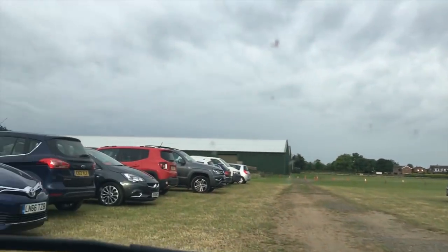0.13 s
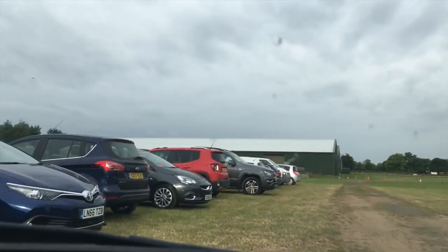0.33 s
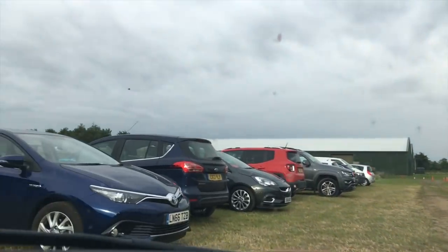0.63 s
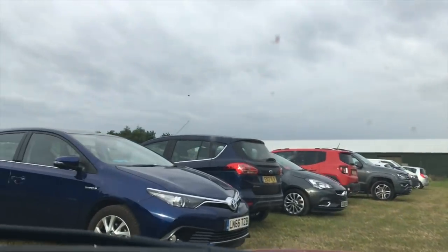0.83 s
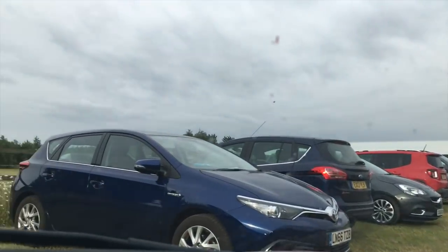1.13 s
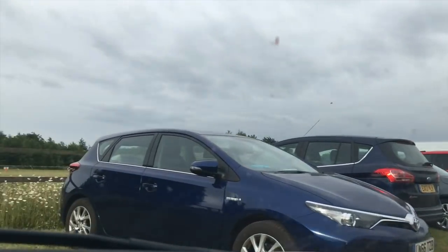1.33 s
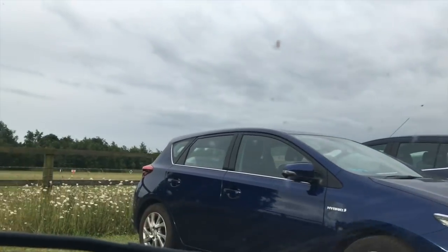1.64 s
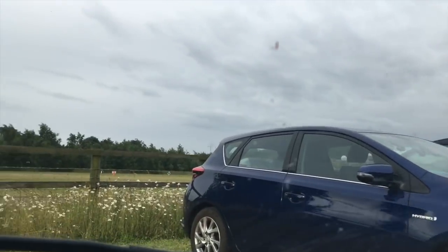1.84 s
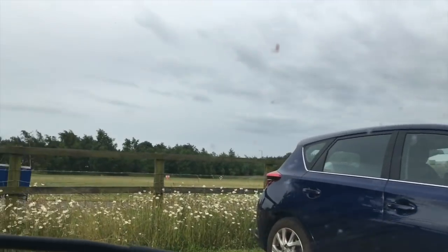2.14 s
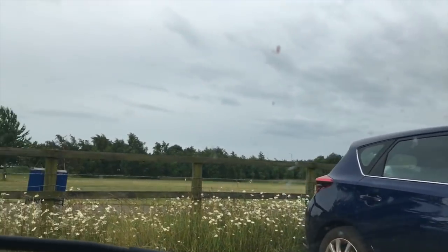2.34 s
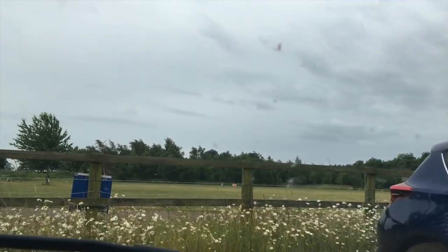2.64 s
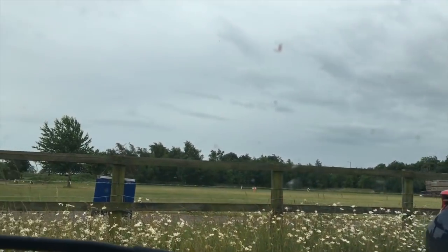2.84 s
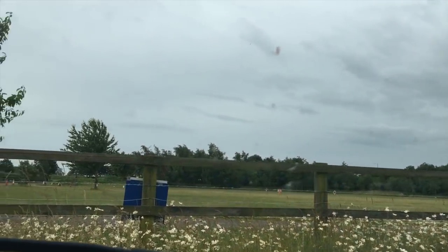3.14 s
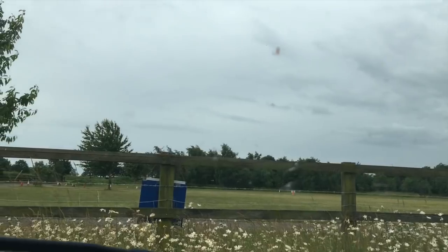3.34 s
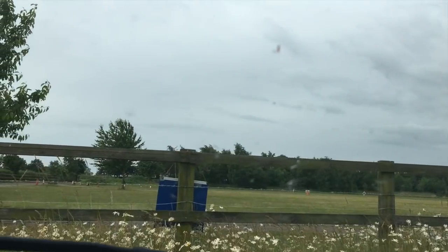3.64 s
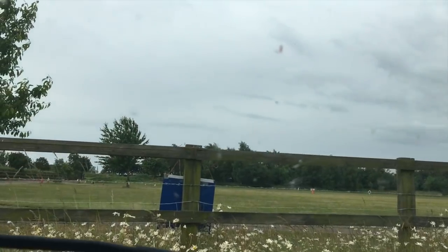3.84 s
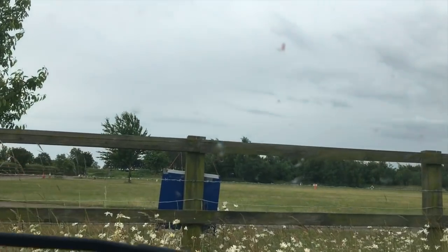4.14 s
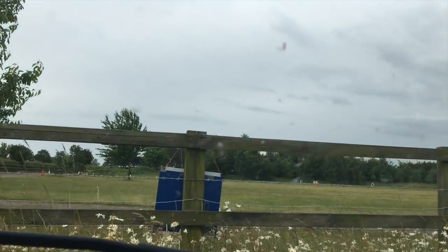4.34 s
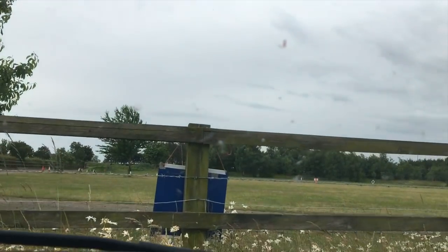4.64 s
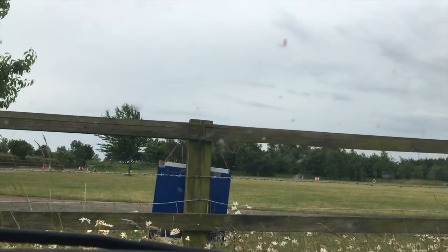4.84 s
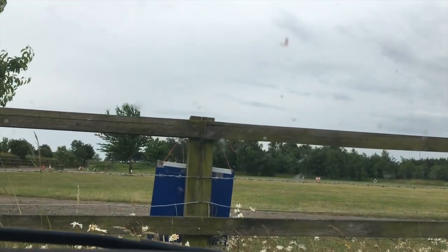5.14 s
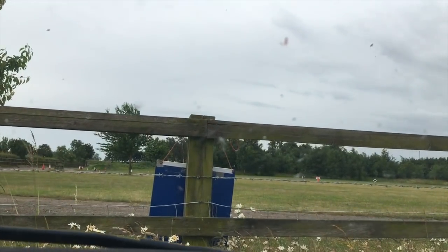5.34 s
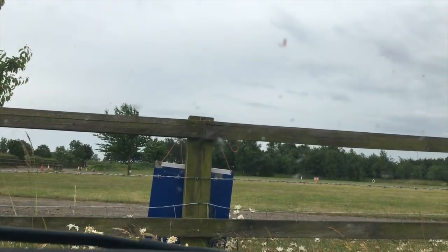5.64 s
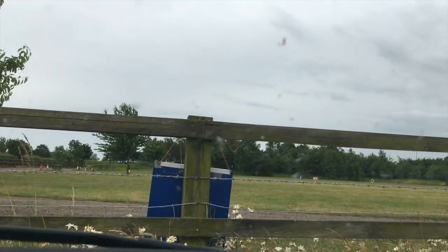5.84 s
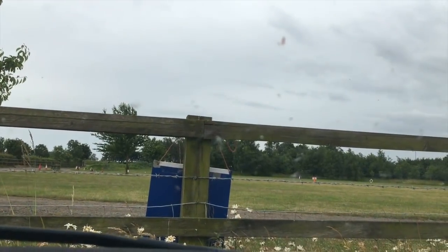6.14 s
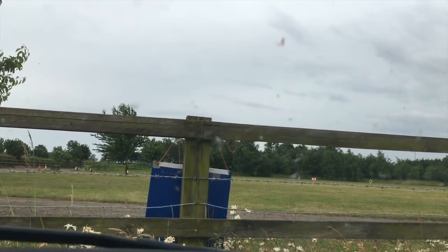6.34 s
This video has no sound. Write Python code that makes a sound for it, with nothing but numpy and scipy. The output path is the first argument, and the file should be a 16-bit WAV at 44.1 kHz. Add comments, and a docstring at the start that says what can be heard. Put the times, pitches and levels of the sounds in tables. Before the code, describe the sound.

Heard from a front seat in mono, a car creeps over uneven grass with a deep engine boom, low tyre rumble and steady fan rush. Plastic trim clicks sparsely and keys tinkle finely, strongest around the middle. The ground shaking eases as the car slows, then the handbrake ratchets over four quick teeth, surrounded by dull thumps.

```python
"""Creeping car and handbrake

Inside a slow car the engine booms, a fan rushes and uneven ground shakes the body and tyres.
Keys tinkle as rings of many sine waves, and plastic parts click as short bursts of shaped noise.
Soft swishes come and go. Late on, the handbrake clicks over four teeth and rings the floor pan,
with dull thumps, made of low noise, around it.
"""
import sys
import numpy as np
from scipy import signal
from scipy.fft import rfft, irfft, next_fast_len
from scipy.io import wavfile

SR = 44100
rng = np.random.default_rng(int(sys.argv[2]) if len(sys.argv) > 2 else 0)


def store_pcm(level_fs):
    """Save levels as 16-bit WAV."""
    pcm = np.round(np.clip(level_fs, -1, 1) * 32767).astype(np.int16)
    wavfile.write(sys.argv[1], SR, np.atleast_2d(pcm).T)


N = 286764
TIME = np.arange(N) / SR   # seconds

# The "colour" tables give a noise spectrum; only its shape matters: (frequency [Hz], level [dB])

# Fan rush through the air ducts: (frequency [Hz], level [dB])
FAN_COLOUR = [(120, -24), (170, 8), (225, 9), (270, 0.5), (340, 0), (420, -7), (600, -5.5), (850, -10.5),
              (1250, -27), (2000, -18), (3000, -30.5), (5000, -32.5), (8000, -37.5), (11000, -40.5),
              (16000, -40)]
# Duct resonances: (frequency [Hz], width [Hz], level [dB])
DUCTS = [(1004.6, 84, -57), (1468, 85, -60.5), (2130, 400, -72), (2740, 89, -78.5), (3228, 66, -78),
         (3786, 190, -74.5), (5160, 440, -81), (5970, 230, -83.5), (6780, 210, -89.5)]

# Engine near idle, boom at twice the firing rate: (time [s], boom frequency [Hz], relative level [dB])
ENGINE = [(0, 55.9, -31.5), (1.9, 55.28, -33), (2.4, 56.92, -30), (3.3, 55.64, -33.5), (3.6, 53.96, -33.5),
          (3.95, 52.33, -33), (4.3, 57.3, -37), (4.58, 58.96, -29), (4.8, 55.6, -33), (5.15, 56.2, -35),
          (5.3, 52, -30.5), (5.5, 48.3, -37), (5.9, 46.96, -37.5), (6.5, 45.4, -44.5)]
# Tones that make up the engine: (multiple of the boom frequency [-], relative level [dB])
ENGINE_ORDERS = [(.5, -31), (1, 2), (1.5, -13), (2, -14), (3, -33.5), (4, -18)]
BOOM_FLUTTER_DB = 0.5   # wobble of the boom where GROUND is 0 dB

# How hard the ground shakes the car: (time [s], level [dB])
GROUND = [(0, -3.5), (0.55, 3.5), (1.1, -6), (1.8, -6), (2.2, -21.5), (3.8, -17.5), (4.35, -9), (4.9, -18),
          (6.5, -7)]
# The wheels roll over a hump: (time of the middle [s], swell [dB])
HUMPS = [(0.027, 2), (0.36, 2.5), (0.59, 4), (0.8, 4), (1.22, 3), (1.77, 7), (3.5, 3.5), (3.72, 3)]
HUMP_S, HUMP_HEAVE_SHARE = 0.2, 0.85   # length of a hump; share of its swell that heaves the body
# Slow shaking of the body: (frequency [Hz], level [dB])
HEAVE_COLOUR = [(24, -7), (31, 1.5), (38, 1.5), (55, -28), (70, 0), (100, -15)]
# Jolts of the suspension: (frequency [Hz], level [dB])
JOLT_COLOUR = [(60, 4.5), (78, -9.5), (98, 3), (112, -6.5), (130, -12)]
# Tread drumming through the floor: (frequency [Hz], level [dB])
RUMBLE_COLOUR = [(60, -16), (90, 3.5), (110, -4.5), (135, 1.5), (170, -3.5), (230, -5.5), (300, -16),
                 (420, -27), (800, -33), (1600, -53)]
# Average level where GROUND is 0 dB, away from humps, and share of the ground's swing followed
HEAVE_DB, HEAVE_FOLLOWS = -34.5, 1.0
JOLT_DB, JOLT_FOLLOWS = -30.5, 0.82
RUMBLE_DB, RUMBLE_FOLLOWS = -38.5, 0.29

# Soft high swishes, like hands sliding on the wheel: (time of the middle [s], length [s], level [dB])
SWISHES = [(0.408, 0.35, -67.5), (1.855, 0.25, -79), (2.56, .45, -73), (3.453, 0.42, -74), (5.88, .2, -69),
           (6.163, 0.4, -74)]
# Rustle of the swishes: (frequency [Hz], level [dB])
RUSTLE_COLOUR = [(4000, -11), (7000, -7), (10000, -7), (13000, -2), (16000, -4)]
HISS_DB = -85.5   # faint rustle between the swishes

# Plastic clicks: (time [s], relative level [dB], tilt [dB per octave],
# ring frequency [Hz], ring against the click [dB])
CLICKS = [(0.2525, -38, 1, 4220, -9.5), (0.3212, -42, 3.5, 3900, -27), (0.953, -37.5, 4, 4330, -6),
          (1.0017, -40, -2.5, 1190, -3), (1.6926, -38.5, 2, 4330, -8), (1.7411, -36, 1.5, 1210, -7),
          (2.4092, -33, 1, 4420, -9.5), (2.448, -35, -5, 800, -9), (2.541, -51.5, 7, 4470, -4),
          (5.4924, -50, 5.5, 2490, -1.5), (5.9706, -40, 5.5, 2060, 0), (5.9907, -39.5, 4, 1020, 3.5),
          (6.0753, -45.5, 7, 2640, -7)]
# Plastic noise: (frequency [Hz], level [dB])
CLICK_COLOUR = [(300, 2.5), (500, -21), (720, 6.5), (1000, 5), (1220, 4.5), (1600, -2), (2150, 1.5),
                (2550, -4), (3100, -6.5), (4200, -8.5), (6000, -9.5), (7500, -14), (16000, -20)]

# Dull thumps in the footwell: (time [s], relative level [dB], tilt [dB per octave])
THUMPS = [(5.480, -32.5, 2.5), (5.662, -21.5, -5), (5.692, -20.5, -7.5), (5.742, -25.5, -1.5),
          (5.781, -28, -7), (5.978, -23.5, -3), (6.185, -21.5, -5.5), (6.291, -20.5, 1.5), (6.370, -17, -2)]
# Thump noise: (frequency [Hz], level [dB])
THUMP_COLOUR = [(50, -23), (80, -3), (120, 4), (160, -2.5), (205, -1.5), (250, -15), (300, -13), (355, -11),
                (440, -34.5), (520, -29.5)]
THUMP_RISE_S, THUMP_HOLD_S, THUMP_T60_S = 0.0094, 0.026, 0.15   # t60: time to fall by 60 dB

# Handbrake catch dropping over a tooth:
# (time [s], relative level [dB], tilt [dB per octave], relative blow to the floor pan [dB])
TEETH = [(5.641, -27.5, -0.5, -16), (5.670, -26, 1.5, -12.5), (5.7009, -27.5, 1.5, -25),
         (5.732, -29.5, 0.5, -32)]
# Catch noise: (frequency [Hz], level [dB])
PAWL_COLOUR = [(350, -1.5), (480, -9), (650, -7), (1060, 3), (1250, -15), (1480, 1.5), (1900, -9),
               (2350, 4), (3200, -3.5), (4300, -6), (6000, -10), (7600, -14.5), (12000, -11.5),
               (16000, -17)]
# Squeaks as the catch rides up a tooth: (time [s], level [dB])
SQUEAKS = [(5.634, -38), (5.657, -46), (5.726, -45)]
# Squeak noise: (frequency [Hz], level [dB])
SQUEAK_COLOUR = [(2400, -32), (2700, 3), (2850, -17), (3050, -8), (3400, -31)]
# Ringing of the floor pan: (frequency [Hz], relative level [dB], time to fall by 60 dB [s])
FLOOR_MODES = [(97.2, -16.5, 0.34), (125, -15.5, 0.18), (164, -30, 0.065), (260.5, 3.5, 0.14),
               (284.4, -8, 0.26), (430, -6, 0.085)]

# Keys knocking together: (time [s], relative level [dB], middle modes [dB], low modes [dB])
KEY_TOUCHES = [(1.044, -46.5, 2, 1), (1.1325, -49, -10, -8), (1.2276, -37, -5, -5), (1.3239, -43, -10, -13),
               (1.3597, -41.5, -17, -3), (1.5321, -43, -11, -2), (1.6396, -46, 2, -1.5),
               (1.8306, -48.5, -2, 0), (1.9783, -56, -8, -6), (2.2403, -50, 4, 2), (2.2879, -45, -8, 0),
               (2.361, -44, -11, -10), (2.4553, -37.5, -12, -4), (2.9258, -35, -16, -1),
               (2.9822, -40.5, -13, -16), (3.0807, -38.5, -9, -4), (3.2246, -45, -6, 4),
               (3.2968, -35, -2, 2.5), (3.5667, -27.5, -3, 0.5), (3.5856, -42, -4, -2),
               (3.68, -39.5, -8, -7), (3.8836, -26.5, 6, -2), (3.933, -49.5, 1.5, 9), (4.1775, -33, 2, 9),
               (4.2727, -36, -14, -12), (4.5131, -39.5, 3, 1), (4.6713, -51.5, 6, 4), (4.7775, -39, -6, -4),
               (5.3803, -49, -5, 3), (6.2223, -52, -9, -7)]
# Ringing of the keys: (average frequency [Hz], relative level [dB], time to fall by 60 dB [s])
KEY_MODES = [(4370, -8.5, .04), (5540, -9.5, .037), (6231, -13.5, .032), (8948, -12, .03),
             (9260, 1.5, .028), (9450, -4, .035), (10850, -7, .03), (11150, 4, .028), (11350, -4, .04),
             (11900, -8, .025), (12400, -4, .028), (12750, -6, .028), (13150, -8, .025), (13930, -10, .025),
             (14750, -11, .026), (15250, -2, .036), (15470, -5, .04)]
# Lighter touches by chance; below 0 means none: (time [s], rate [touches per s])
KEY_SWING = [(0.5, -0.5), (1.1, 18.5), (2.4, 24), (3.2, 7.5), (5.3, 3.5), (6.5, 1.5)]
LIGHT_TOUCH_DB, LIGHT_SPREAD_DB = -56, 3.5   # middle of the relative level, and reach either side
LIGHT_LOWER_MODES_DB = -4   # change of the low and middle modes in a light touch
KEY_CRACK, KEY_CRACK_S, KEY_RISE_S = 1.5, 0.0027, 0.003   # crack strength, fade and rise times
KEY_CRACK_SPREAD_DB, KEY_SCATTER_DB = 1.5, 2.5   # chance in the crack and in each mode

# Dips of the microphone port: (frequency [Hz], width [Hz])
PORT_DIPS = [(4850, 270), (7800, 350), (10300, 320)]
CUTOFF_HZ = 15900


def from_db(db):
    """Turn decibels into a gain."""
    return 10 ** (np.asarray(db) / 20)


def rms_one(x):
    """Scale to an average strength (rms) of 1."""
    return x / np.sqrt(np.mean(x ** 2) + 1e-20)


def in_time(rows):
    """Draw each column of a time table as a curve with a value at every sample."""
    s, *columns = np.transpose(rows)
    return [np.interp(TIME, s, column) for column in columns]


def drift(rate):
    """Smooth random wander of rms 1, made of noise below about rate hertz."""
    # one value per 40 samples; the first 2000 let the filter settle
    r = np.exp(-80 * np.pi * rate / SR)
    raw = rng.standard_normal(N // 40 + 2002)
    slow = signal.lfilter([1], [1, -2 * r, r * r], raw)[2000:]
    return np.interp(np.arange(N) / 40, np.arange(len(slow)), rms_one(slow))


def noise(colour, tilt_db=0, size=N):
    """Noise of rms 1 with a given spectrum, tilted per octave and falling steeply past its ends."""
    hz, db = np.transpose(colour)
    length = next_fast_len(size)
    octave = np.log2(np.maximum(np.fft.rfftfreq(length, 1 / SR), 1))
    outside = np.abs(octave - np.clip(octave, np.log2(hz[0]), np.log2(hz[-1])))
    shape_db = np.interp(octave, np.log2(hz), db) + tilt_db * octave - 24 * outside
    spectrum = rfft(rng.standard_normal(length)) * from_db(shape_db)
    return rms_one(irfft(spectrum, length)[:size])


def ring(drive, hz, t60):
    """One ringing tone (a mode): a unit click starts a fading sine of height about 1."""
    r = from_db(-60 / (t60 * SR))
    w = 2 * np.pi * hz / SR
    return signal.lfilter([0, np.sin(w)], [1, -2 * r * np.cos(w), r * r], drive + 1e-18)


def burst(colour, tilt_db, rise_s, t60, hold_s=0, size=SR // 3):
    """A blow on a part with many close modes: noise swells, may hold, then dies away."""
    t = TIME[:size]
    fade_db = -60 * np.maximum(t - rise_s - hold_s, 0) / t60
    envelope = np.minimum(t / rise_s, 1) * from_db(fade_db)
    return rms_one(noise(colour, tilt_db, size) * envelope) * np.sqrt(np.mean(envelope ** 2))


def band(hz):
    """The spectrum of one narrow resonance."""
    return [(hz / 1.3, -26), (hz / 1.03, -3), (hz, 0), (hz * 1.03, -3), (hz * 1.15, -26)]


def swell(s, length_s):
    """A smooth rise and fall of height 1 around a moment."""
    return np.cos(np.pi * np.clip((TIME - s) / length_s, -.5, .5)) ** 2


def add(out, s, sound):
    """Mix a sound in at a time."""
    start = round(s * SR)
    out[start:start + len(sound)] += sound[:N - start]


def cabin(x, wet_db, t60, size=SR // 10):
    """Glass and dashboard return dense reflections that the seats soon soak up."""
    t = TIME[:size]
    echoes = rng.standard_normal(size) * from_db(-60 * t / t60) * (t > .001)
    wet = signal.fftconvolve(x, echoes / np.linalg.norm(echoes))[:len(x)]
    return x + from_db(wet_db) * wet


def air():
    """The fan's rush is noise with a slight wander; ducts ring at their own pitches."""
    rush = from_db(-47.5 + 1.1 * drift(23)) * noise(FAN_COLOUR)
    ducts = np.zeros(N)
    for hz, width, db in DUCTS:
        t60 = np.log(1000) / (np.pi * width)   # a wider resonance dies sooner
        ducts += from_db(db) * rms_one(ring(rng.standard_normal(N), hz, t60))
    high_pass = signal.butter(2, 700, "high", fs=SR, output="sos")
    return rush + signal.sosfilt(high_pass, ducts)


def humps_db():
    """Each hump loads the car for a moment."""
    return sum(db * swell(s, HUMP_S) for s, db in HUMPS)


def engine():
    """The boom swells over humps and flutters on rough ground; the other tones waver more."""
    hz, boom_db = in_time(ENGINE)
    ground_db, = in_time(GROUND)
    shake_db = humps_db() + BOOM_FLUTTER_DB * from_db(ground_db) * drift(4.7)
    phase = 2 * np.pi * np.cumsum(hz) / SR
    out = np.zeros(N)
    for order, db in ENGINE_ORDERS:
        rough = .09 if order == 1 else .5
        strength = from_db(db) * (1 + rough * drift(10.5))
        wander = rough * drift(20) + 2 * np.pi * rng.random()
        out += strength * np.sin(order * phase + wander)
    return np.sqrt(2) * from_db(boom_db + shake_db - 1.2) * out


def tyres():
    """Uneven ground heaves the body and jolts the suspension; the tread drums through the floor."""
    ground_db, = in_time(GROUND)
    heave_db = HEAVE_DB + HEAVE_FOLLOWS * ground_db + HUMP_HEAVE_SHARE * humps_db()
    jolt_db = JOLT_DB + JOLT_FOLLOWS * ground_db + 2.66 * drift(6.4)
    rumble_db = RUMBLE_DB + RUMBLE_FOLLOWS * ground_db + 1.3 * drift(13.0)
    heave = from_db(heave_db) * noise(HEAVE_COLOUR)
    jolts = from_db(jolt_db) * noise(JOLT_COLOUR)
    rumble = from_db(rumble_db) * noise(RUMBLE_COLOUR)
    return heave + jolts + rumble


def rustle():
    """A faint high rustle that swells with each swish."""
    swishes = sum(from_db(db) * swell(s, length_s) for s, length_s, db in SWISHES)
    return (from_db(HISS_DB) + swishes) * noise(RUSTLE_COLOUR)


def plastic():
    """Column and trim click: a brief bright snap, a duller body and the ring of the part that moved."""
    out = np.zeros(N)
    for s, db, tilt_db, ring_hz, ring_db in CLICKS:
        snap = from_db(-3.5) * burst(CLICK_COLOUR, tilt_db, rise_s=0.001, t60=0.011)
        body = burst(CLICK_COLOUR, tilt_db - 5.5, rise_s=0.0062, t60=0.037)
        part = from_db(ring_db) * burst(band(ring_hz), 0, rise_s=0.0029, t60=0.031)
        add(out, s, from_db(db - 2.0) * (snap + body + part))
    return out


def thumps():
    """Pedals and lever come to rest against the carpeted floor, with a soft start."""
    out = np.zeros(N)
    for s, db, tilt_db in THUMPS:
        thump = burst(THUMP_COLOUR, tilt_db, THUMP_RISE_S, THUMP_T60_S, THUMP_HOLD_S)
        add(out, s, from_db(db - 6) * thump)
    return out


def light_touches():
    """Swinging keys brush each other at uneven intervals; rows have the columns of KEY_TOUCHES."""
    rate, = in_time(KEY_SWING)
    due = np.cumsum(np.maximum(rate, 0)) / SR   # touches expected so far
    chance = rng.random((100, 2))[:int(due[-1])]
    rows = []
    for k, (late, strength) in enumerate(chance):
        s = np.interp(k + late, due, TIME)
        db = LIGHT_TOUCH_DB + LIGHT_SPREAD_DB * (2 * strength - 1)
        rows.append((s, db, LIGHT_LOWER_MODES_DB, LIGHT_LOWER_MODES_DB))
    return rows


def keys(size=SR // 8):
    """Each touch cracks and rings the keys' modes, with new strengths and slightly new pitches."""
    out, t = np.zeros(N), TIME[:size]
    hz, db, t60 = np.transpose(KEY_MODES)[:, :, None]
    high_pass = signal.butter(2, 7000, "high", fs=SR, output="sos")
    for s, touch_db, middle_db, low_db in list(KEY_TOUCHES) + light_touches():
        contact_db = np.select([hz < 7500, hz < 10200], [low_db, middle_db], 0)
        strength_db = db + contact_db + KEY_SCATTER_DB * rng.standard_normal(hz.shape)
        detuned = hz * (1 + .006 * rng.standard_normal(hz.shape))
        modes = from_db(strength_db - 60 * t / t60) * np.sin(2 * np.pi * detuned * t)
        crack = signal.sosfilt(high_pass, rng.standard_normal(size)) * np.exp(-t / KEY_CRACK_S)
        # some touches snap, others ring
        hardness = KEY_CRACK * from_db(KEY_CRACK_SPREAD_DB * rng.standard_normal())
        tink = (modes.sum(axis=0) + hardness * crack) * np.minimum(t / KEY_RISE_S, 1)
        heard = rms_one(cabin(tink, wet_db=-4.0, t60=0.045))
        add(out, s - .001, from_db(touch_db - 22) * heard)
    return out


def handbrake():
    """The catch (pawl) snaps down over each tooth; the lever's bracket sets the floor pan ringing."""
    out = np.zeros(N)
    push = signal.windows.hann(SR // 400) / (SR // 800)   # a soft push of total about 1
    push = np.pad(push, (0, SR // 3))
    pan = sum(from_db(mode_db) * ring(push, hz, t60) for hz, mode_db, t60 in FLOOR_MODES)
    pan = pan * np.minimum(TIME[:len(pan)] / 0.011, 1)   # the sheet takes a moment to swing up
    for s, db in SQUEAKS:
        add(out, s, from_db(db) * burst(SQUEAK_COLOUR, 0, rise_s=0.013, t60=0.054))
    for s, db, tilt_db, blow_db in TEETH:
        snap = burst(PAWL_COLOUR, tilt_db, rise_s=0.0036, t60=0.042)
        # the cabin holds the lows longer
        tail = from_db(-3.0) * burst(PAWL_COLOUR, -9.0, rise_s=0.0096, t60=0.1)
        add(out, s, from_db(db - 2.5) * (snap + tail))
        add(out, s + 0.0028, from_db(blow_db + 0.6) * pan)
    return out


def scene():
    """Everything as heard from a front seat, in one channel."""
    background = air() + engine() + tyres() + rustle()
    return (background + plastic() + thumps() + keys() + handbrake())[None]


def record(dry):
    """The microphone sheds the deepest bass and dips the treble in places; the top is cut."""
    dry = signal.sosfilt(signal.butter(2, 24, "high", fs=SR, output="sos"), dry)
    for hz, width in PORT_DIPS:
        notched = signal.lfilter(*signal.iirnotch(hz, hz / width, fs=SR), dry)
        dry = dry + 0.47 * (notched - dry)   # only part of the full notch
    return signal.sosfilt(signal.ellip(10, .3, 70, CUTOFF_HZ, fs=SR, output="sos"), dry)


dry = scene()
out = record(dry)
store_pcm(out)
```